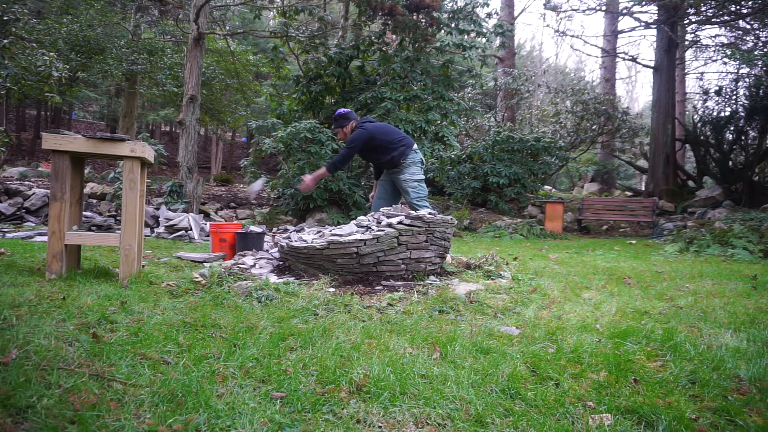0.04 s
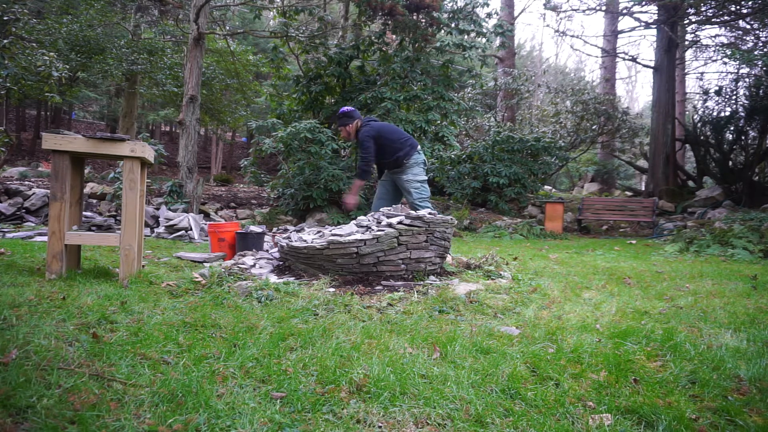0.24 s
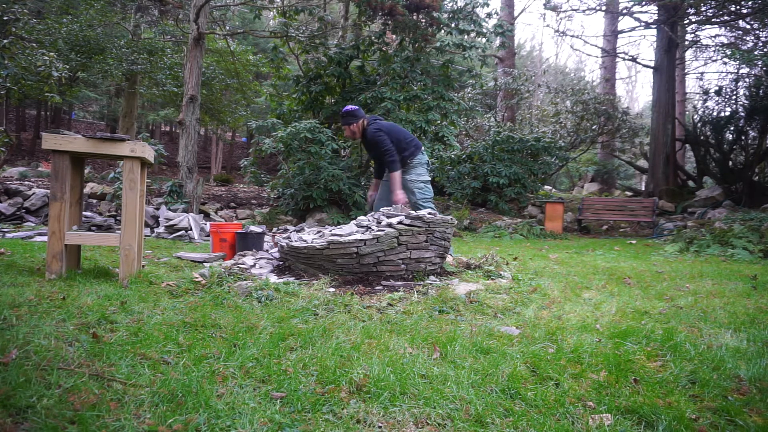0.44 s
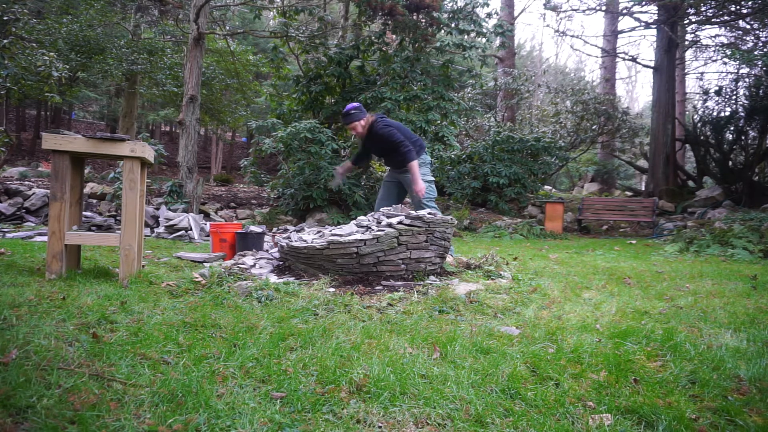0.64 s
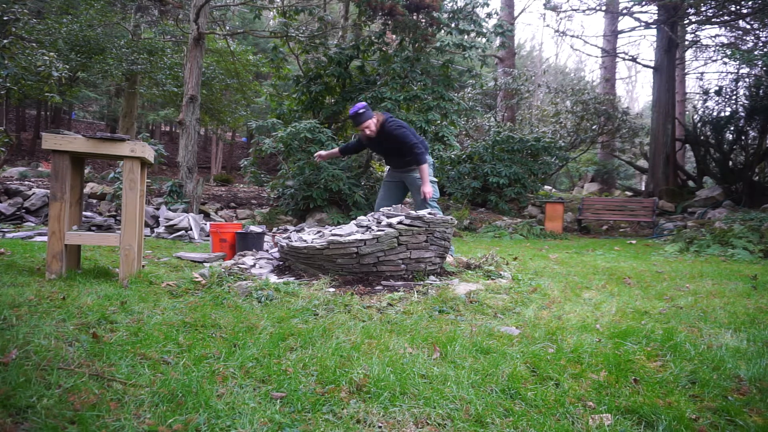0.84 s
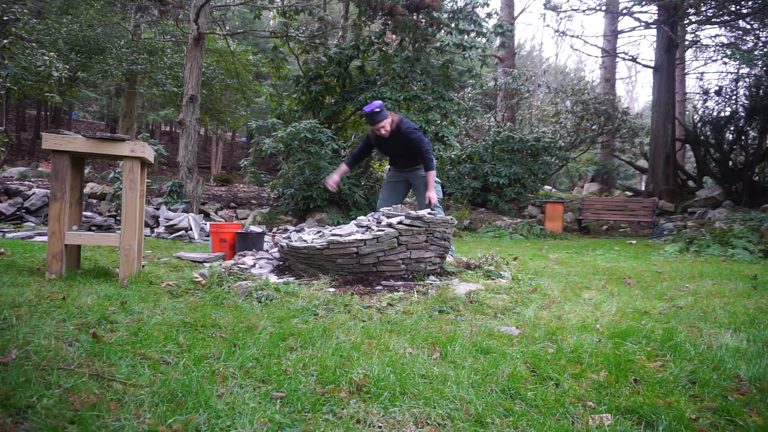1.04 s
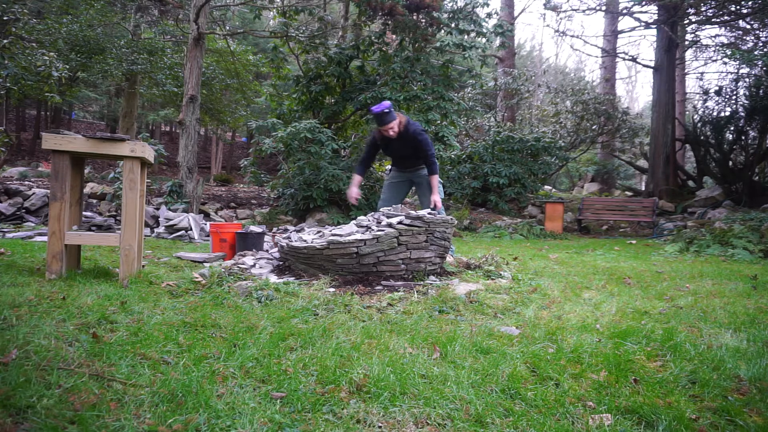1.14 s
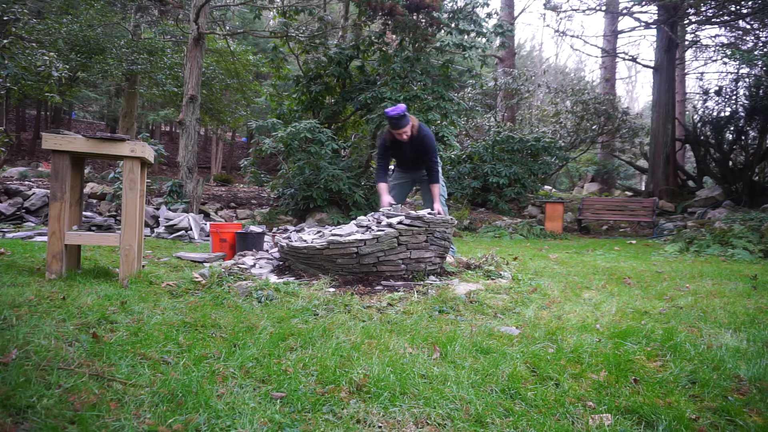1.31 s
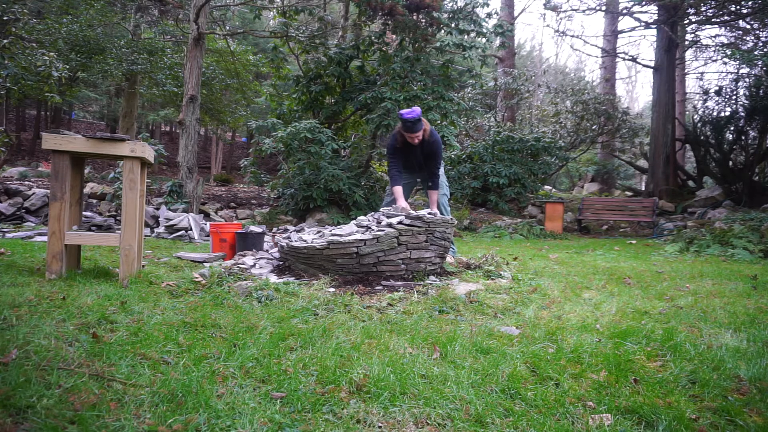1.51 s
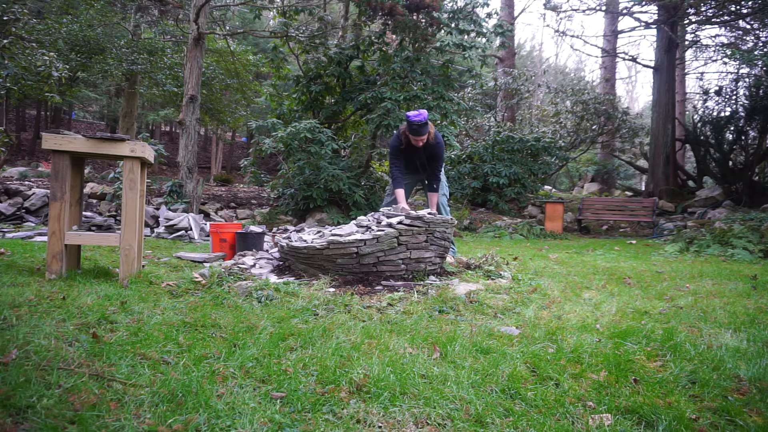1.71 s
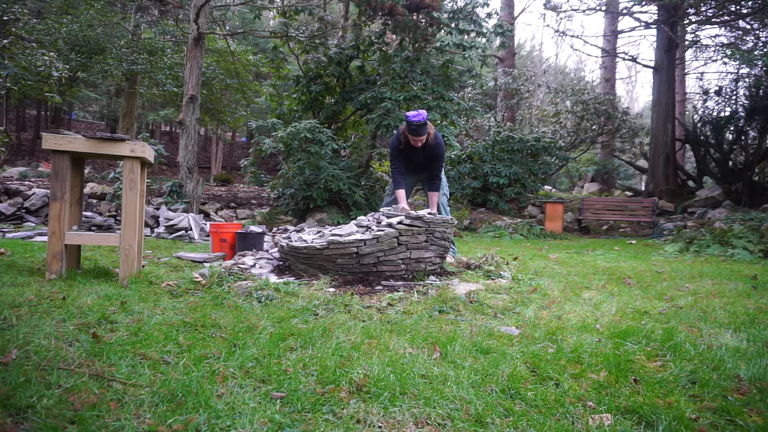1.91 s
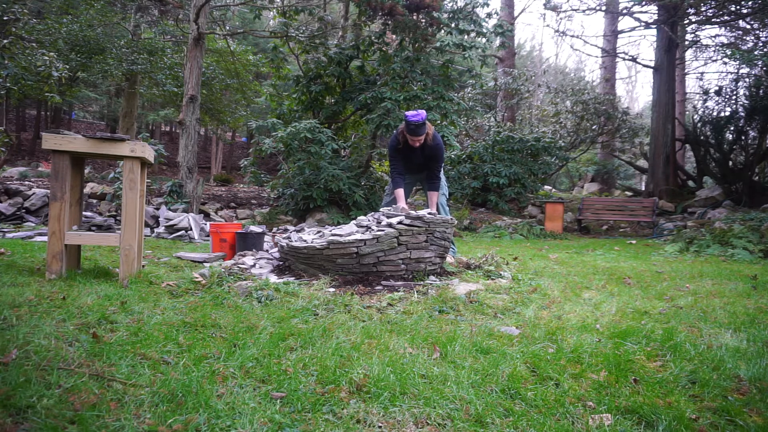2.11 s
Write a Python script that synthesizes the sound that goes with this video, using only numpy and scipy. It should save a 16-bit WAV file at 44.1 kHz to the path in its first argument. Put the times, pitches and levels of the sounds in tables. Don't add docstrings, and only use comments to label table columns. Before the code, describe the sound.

Stones clatter in a quiet wooded yard over faint distant traffic. At 0.24 s a dense burst hits a plastic bucket with hollow booms, smaller knocks settling until 0.75. After a pause, sharp stone-on-stone cracks at 1.14-1.31 tumble with sliding gravel on the left, trickling away with a light tap near 1.56. From 1.8 to 2.15 stones scrape and nudge near the middle; cloth rustles faintly.

```python
import sys
import numpy as np
from scipy import signal
from scipy.fft import rfft, irfft
from scipy.io import wavfile
from scipy.ndimage import uniform_filter1d

SR = 44100
rng = np.random.default_rng(int(sys.argv[2]) if len(sys.argv) > 2 else 0)


def invert_db(x):
    u = np.asarray(x, float) / 20
    return 10 ** u


def waveform_to_disk(signal):
    frames = np.transpose(np.atleast_2d(signal))
    scaled = np.clip(frames, -1, 1) * 32767
    samples = np.round(scaled).astype(np.int16)
    wavfile.write(sys.argv[1], SR, samples)


N = 94815

# start_s, rise_s, level_db, t60_s
SCRAPE = [
    (1.798, 0.063, -46.5, 0.93),
    (1.89, 0.029, -41, 1),
    (1.96, 0.085, -41, 0.58),
    (2.03, 0.019, -46, 0.56),
    (2.09, 0.016, -45, 0.96),
]
# freq_hz, level_db
SCRAPE_TONE = [(400, -5.5), (800, 2), (1500, -0.5), (1950, 2), (2500, -6.5), (3300, -5.5), (4100, -8.5),
               (11000, -19)]


def read(points, hz):
    f, value = np.transpose(points)
    return np.interp(np.log(hz + 1), np.log(f + 1), value)


def evened(x):
    return x / np.sqrt(np.mean(x ** 2) + 1e-20)


def add(mix, start_s, sound):
    part = mix[round(start_s * SR):][:len(sound)]
    part += sound[:len(part)]


def ring(hz, t60_s, size=1500):
    t = np.arange(size) / SR
    return invert_db(-60 * t / t60_s) * np.sin(2 * np.pi * hz * t)


def slow(size):
    return evened(uniform_filter1d(uniform_filter1d(rng.standard_normal(N), size), size))


def fuzzy(hz, width_hz):
    r = np.exp(-np.pi * width_hz / SR)
    noise = rng.standard_normal(N) + 1j * rng.standard_normal(N)
    fuzz = signal.lfilter([1], [1, -r], signal.lfilter([1], [1, -r], noise))
    phase = 2 * np.pi * np.cumsum(hz * np.ones(N)) / SR
    return evened((fuzz * np.exp(1j * phase)).real)


def hum():
    # freq_hz, level_db
    hum_tone = [(12, -59), (20, -1.5), (119, -3.5), (151, -11.5), (192, -12), (1080, -17), (2400, -31.5),
                (5000, -39.5), (10600, -40), (11500, -43), (15000, -95), (22000, -120)]
    # freq_hz, likeness
    likeness = [(60, 1.0), (220, 0.95), (840, 0.42), (3120, 0.0075), (11700, 0.035)]
    # pitch_hz, width_hz, level_db
    drones = [
        (82.8, 22, -52),
        (119.6, 8.5, -56.5),
    ]
    # time_s, pitch_hz, level_db
    engine = [(0, 299.7, -57), (.15, 330, -48), (0.902, 340, -55), (1.1, 350, -54), (1.401, 350, -52.5),
              (1.6, 280, -47.5), (1.75, 300, -46.5), (1.95, 290, -49), (2.15, 285, -45.5)]
    hum_db, swell_db, engine_width_hz = -45, -0.5, 106

    frames, hz = N // 256 + 5, np.fft.rfftfreq(1024, 1 / SR)
    a, b, c, d, patches = rng.standard_normal((frames, 513, 5)).T
    patches = evened(uniform_filter1d(uniform_filter1d(patches, 10, 0), 12, 1))
    same = np.clip(read(likeness, hz), -1, 1)[:, None]
    left = a + 1j * b
    right = same * left + np.sqrt(1 - same ** 2) * (c + 1j * d)
    z = np.array([left, right]) * invert_db(read(hum_tone, hz)[:, None] + 2.0 * patches)
    out = invert_db(hum_db) * evened(signal.istft(z, nperseg=1024, noverlap=768)[1][:, :N])
    for pitch_hz, width_hz, db in drones:
        out += invert_db(db + swell_db * slow(size=4000)) * fuzzy(pitch_hz, width_hz)
    time_s, pitch_hz, db = np.transpose(engine)
    t = np.arange(N) / SR
    return out + invert_db(np.interp(t, time_s, db)) * fuzzy(np.interp(t, time_s, pitch_hz), engine_width_hz)


def grit(flurries, tone):
    grains_per_s, grain_spread_db, grain_t60_s, kinds = 12000, 2.5, 0.0071, 24
    t = np.arange(N) / SR
    power = np.zeros(N)
    for start_s, rise_s, db, t60_s in flurries:
        decay_s = np.maximum(t - start_s - rise_s, 0)
        power += np.clip((t - start_s) / rise_s, 0, 1) ** 2 * invert_db(2 * db - 120 * decay_s / t60_s)
    level = np.sqrt(power)
    size = invert_db(grain_spread_db * np.minimum(rng.exponential(1, N), 5))
    size = size * (rng.random(N) < grains_per_s / SR)
    kind, x = rng.integers(0, kinds, N), np.zeros(N)
    for k, hz in enumerate(np.geomspace(500, 11000, kinds)):
        grain = ring(hz, grain_t60_s * (2000 / hz) ** .5, size=800)
        x += signal.oaconvolve(size * (kind == k), grain)[:N]
    z = rfft(x)
    z = z / np.sqrt(uniform_filter1d(abs(z) ** 2, 400) + 1e-9)
    z = z * invert_db(read(tone, np.fft.rfftfreq(N, 1 / SR)))
    return evened(irfft(z, N)) * level, size * level / np.sqrt(np.mean(size ** 2))


def spread(flurries, tone):
    near, shakes = grit(flurries, tone)
    return np.array([near, grit(flurries, tone)[0]]), shakes


def clack(db, hz, upper_hz, tick_db, t60_s, rise_s, upper=0.7):
    overtone_db, thud_db, tick_t60_s = -18, -14, 0.014
    t = np.arange(1500) / SR
    body = ring(hz, t60_s) - upper * ring(upper_hz, t60_s)
    body += invert_db(overtone_db) * ring(hz * 2.9, t60_s * .5)
    body += invert_db(thud_db) * ring(800, 0.0079)
    tick = signal.lfilter([1, -.6], [1], rng.standard_normal(1500)) * invert_db(tick_db - 60 * t / tick_t60_s)
    return invert_db(db) * (body * (1 - np.exp(-t / rise_s)) * 1.67 + tick)


def strike(mix, hits, t60_s=0.012, rise_s=0.00052):
    for start_s, *row in hits:
        add(mix, start_s, clack(*row, t60_s, rise_s))


def bucket():
    # start_s, clack_db, pitch_hz, low_boom_db, high_boom_db
    drops = [(0.2363, -8.5, 2080, -12, -12), (0.246, -12, 2300, -15, -13.5), (.253, -6, 2880, -7.5, -16.5),
             (.2585, -6.5, 1706, -17, -15.5), (0.272, -6, 2640, -28, -12.5),
             (0.3034, -7.5, 1970, -29, -8.5), (.349, -15, 1970, -17.5, -19), (.372, -9, 1526, -14, -26),
             (0.453, -18, 2230, -46, -44), (0.493, -12, 1690, -24, -28), (0.512, -17, 2090, -29, -44),
             (0.5802, -11, 1640, -36, -22.5), (0.578, -15.5, 4670, -38, -35), (.592, -20, 1950, -10.5, -31),
             (0.638, -17.5, 1550, -29, -30), (0.6737, -21.5, 1600, -33, -25.5), (.712, -47, 1500, -38, -52),
             (.742, -45, 1500, -40, -31)]
    # start_s, rise_s, level_db, t60_s
    churning = [
        (.237, 0.0037, -25, 0.87),
        (.285, 0.02, -42, 1),
        (.41, 0.11, -35, 0.38),
        (.453, 0.0021, -27, 0.13),
        (.475, 0.019, -30.5, 0.23),
        (.545, 0.0071, -34.5, 0.029),
        (.578, 0.001, -32, 0.25),
        (.63, 0.0049, -41.5, 0.24),
    ]
    # freq_hz, level_db
    churn_tone = [(590, 0), (1000, -1.5), (2960, -4.5), (4980, -15), (8220, -16), (11000, -22),
                  (14300, -64), (22000, -120)]
    # pitch_hz, level_db, t60_s
    modes = [(138, -12.5, 0.094), (219, -6, 0.18), (250, -6, 0.052), (300, -10, 0.087), (392, -3, 0.058),
             (469, -4, 0.15), (533, -13.5, 0.07), (566, -34, 0.028), (734.5, -10.5, 0.16), (929, -11, 0.12),
             (1140, -19, 0.076)]
    main_modes = (1, 5)
    split_hz, bass_cut_hz = 345, 120
    boom_db, mode_spread_db, wobble = -5.5, 4.5, .02
    churn_boom_db, churn_high_db = -20.5, -17
    low_damping_per_s, high_damping_per_s = 1.2, 7
    clack_t60_s, clack_rise_s, upper, wall_tick_db = .014, 0.0012, 0.26, -6

    out, shakes = spread(churning, churn_tone)
    walls, mix = np.zeros(N), rng.standard_normal((len(drops), len(modes)))
    for k, (hz, db, t60_s) in enumerate(modes):
        low, loose = hz < split_hz, k not in main_modes
        blows = shakes * rng.choice([-1., 1.], N) * invert_db(db + churn_boom_db + churn_high_db * (not low))
        walls += signal.oaconvolve(blows, ring(hz, t60_s / 2, size=9000))[:N]
        damping = low_damping_per_s if low else high_damping_per_s
        sign = (-1) ** k if low or hz > 2 * split_hz else 1
        for row, (start_s, _, _, low_db, high_db) in zip(mix, drops):
            damped_s = t60_s / (1 + damping * (start_s - drops[0][0]))
            level_db = db + (low_db if low else high_db) + boom_db + mode_spread_db * row[k] * loose
            bent_hz = hz * (1 + wobble * row[k - 1] * loose)
            add(walls, start_s, sign * invert_db(level_db) * ring(bent_hz, damped_s, size=9000))
    bass_cut = signal.butter(2, bass_cut_hz, "high", fs=SR, output="sos")
    out[0] += signal.sosfilt(bass_cut, uniform_filter1d(walls, size=15))
    for start_s, db, hz, _, high_db in drops:
        tick_db = high_db - db + wall_tick_db
        add(out[0], start_s, clack(db - 8, hz, hz * 1.2, tick_db, clack_t60_s, clack_rise_s, upper))
    return out


def booms():
    # start_s, level_db, pitch_hz, t60_s, free_s
    swings = [(.237, -16, 492, .12, 0.016), (0.2563, -16.5, 210, 0.22, 0.038),
              (.262, -18.5, 484, 0.22, 0.036), (.3042, -10.5, 474, 0.2, 0.022),
              (.352, -18, 470, 0.18, .022), (.356, -24, 221.6, 0.37, 0.063), (.385, -24, 216, 0.42, 0.094),
              (.492, -31.5, 550, 0.14, 0.036), (.506, -23, 233.4, .3, 0.035), (.548, -32, 250, .2, 0.022),
              (0.5798, -19.5, 490, .12, 0.021), (.591, -19, 222, 0.24, 0.032),
              (.6742, -21.5, 476, 0.053, 0.0054), (0.707, -34.5, 206, .2, .025)]
    rise_s, smother_t60_s = 0.0018, .04
    out, t = np.zeros(N), np.arange(9000) / SR
    for start_s, db, hz, t60_s, free_s in swings:
        level = invert_db(db - 60 * np.maximum(t - free_s, 0) / smother_t60_s)
        add(out, start_s, level * ring(hz, t60_s, size=9000) * (1 - np.exp(-t / rise_s)))
    return out


def pebbles():
    # start_s, clack_db, pitch_hz, upper_hz, tick_db
    clicks = [(0.247, -28, 8300, 3100, -8), (0.2884, -29, 2400, 3360, -15), (0.309, -22, 2650, 1920, -20),
              (.325, -32, 2900, 1620, -18), (0.4816, -26, 1660, 1020, -4), (.5466, -30, 1860, 2600, -6),
              (0.5793, -27.5, 3170, 2270, -3), (.596, -37, 1980, 2900, -13), (.622, -35, 2350, 970, -17),
              (0.742, -44, 2500, 3500, -19)]
    out = np.zeros(N)
    strike(out, clicks)
    return out


def jacket():
    # start_s, length_s, level_db, centre_hz
    rustles = [
        (0.614, 0.1, -45, 8650),
        (1.45, 0.033, -54.5, 7200),
        (1.56, 0.13, -53.5, 8700),
        (1.665, 0.16, -53, 8140),
        (1.918, 0.025, -69, 6900),
        (2.091, 0.098, -49, 7550),
    ]
    out = np.zeros((2, N))
    for start_s, length_s, db, hz in rustles:
        u = np.linspace(0, 1, round(length_s * SR))
        band = signal.butter(1, [hz * .7, min(hz * 1.42, 15000)], "bandpass", fs=SR)
        for side in out:
            cloth = evened(signal.lfilter(*band, rng.standard_normal(len(u))))
            add(side, start_s, invert_db(db) * np.sin(np.pi * u ** 0.28) * cloth)
    return out


def heap():
    # start_s, clack_db, pitch_hz, upper_hz, tick_db
    clacks = [
        (1.1442, -17, 1450, 2090, -19),
        (1.159, -19, 1390, 2480, -25),
        (1.186, -24, 2080, 2820, -9),
        (1.244, -19.5, 1890, 1650, -31),
        (1.2475, -20.5, 2080, 2320, -15),
        (1.311, -29.5, 3360, 4220, -22),
        (1.556, -29.5, 1620, 2600, -16),
        (1.662, -39, 1500, 1990, -9),
    ]
    # start_s, rise_s, level_db, t60_s
    slide = [
        (1.144, 0.0093, -33.5, 0.46),
        (1.165, 0.013, -32, 0.43),
        (1.225, 0.015, -32.5, 0.51),
        (1.297, 0.01, -35, 0.2),
        (1.36, 0.035, -48, 1.17),
        (1.55, 0.018, -56.5, 2.9),
    ]
    # freq_hz, level_db
    slide_tone = [(400, -50), (800, -18), (1250, -12.5), (1800, -3.5), (2200, -4.5), (2900, -9),
                  (3700, -10.5), (11000, -32.5)]
    out = spread(slide, slide_tone)[0]
    strike(out[0], clacks)
    return out


def rolls():
    # start_s, rise_s, level_db, t60_s, pitch_hz
    rolling = [
        (1.148, 0.0032, -27.5, 0.11, 1900),
        (1.168, 0.012, -32.5, 0.22, 2510),
        (1.222, 0.019, -32.5, 0.24, 2050),
        (1.255, 0.011, -39, 0.18, 1740),
        (1.303, 0.011, -40, 0.22, 3300),
        (1.31, 0.0092, -40.5, 0.31, 2050),
    ]
    knock_t60_s, knocks_per_s = .012, 830
    out, t = np.zeros(N), np.arange(9000) / SR
    for start_s, rise_s, db, t60_s, hz in rolling:
        knocks = rng.standard_normal(9000) * (rng.random(9000) < knocks_per_s / SR)
        chatter = evened(signal.oaconvolve(knocks, ring(hz, knock_t60_s))[:9000])
        level = np.clip(t / rise_s, 0, 1) * invert_db(db - 60 * np.maximum(t - rise_s, 0) / t60_s)
        add(out, start_s, chatter * level)
    return out


def cracks():
    # start_s, clack_db, pitch_hz, upper_hz, tick_db
    hard_hits = [
        (1.1553, -11, 1840, 2780, -24),
        (1.2178, -9.5, 1800, 2350, -17),
        (1.2776, -22.5, 1580, 2180, -24),
        (1.2848, -17.5, 1750, 3300, -19),
    ]
    rise_s, snap_db, snap_hz, snap_t60_s = 0.00044, 2, 3300, 0.0014
    out = np.zeros(N)
    strike(out, hard_hits, t60_s=0.0067, rise_s=rise_s)
    for start_s, db, *_ in hard_hits:
        add(out, start_s + rise_s, invert_db(db + snap_db) * ring(snap_hz, snap_t60_s))
    return out


def hands():
    # start_s, clack_db, pitch_hz, upper_hz, tick_db
    nudges = [(1.9165, -31.5, 2450, 1500, -27), (1.978, -34, 1500, 2530, -16),
              (2.046, -25, 2570, 1610, -38), (2.074, -31, 1580, 2300, -9), (2.1025, -32.5, 3010, 1920, -14),
              (2.107, -32.5, 2000, 1500, -20), (1.8951, -37, 2390, 1360, -22),
              (1.928, -46, 5230, 1500, -12), (2.016, -31, 2500, 1500, -20), (2.124, -40, 5900, 1430, -4)]
    out = spread(SCRAPE, SCRAPE_TONE)[0]
    strike(out[0], nudges)
    return out


def slab():
    # pitch_hz, level_db, t60_s
    slab_modes = [(1500, -1.5, 0.029), (2500, -2, 0.025), (4180, -9, 0.018), (4920, -12, 0.021)]
    slab_db, slip_spread_db = -2.5, 4.7
    slips = grit(SCRAPE, SCRAPE_TONE)[1] * rng.choice([-1., 1.], N) * invert_db(slip_spread_db * slow(size=150))
    body = sum(invert_db(db) * ring(hz, t60_s, size=2500) for hz, db, t60_s in slab_modes)
    return invert_db(slab_db) * signal.oaconvolve(slips, body / np.linalg.norm(body))[:N]


def place(x, lead_s, low_db, high_db):
    scatter, turn_limit_rad = 0.7, 2.47
    hz = np.fft.rfftfreq(N, 1 / SR)
    treble = np.minimum(hz / 8000, 1)
    turn = turn_limit_rad * np.tanh(2 * np.pi * hz * lead_s / turn_limit_rad)
    side = invert_db((low_db + (high_db - low_db) * treble ** 0.52) / 2) * np.exp(.5j * turn)
    apart = np.clip(scatter * treble ** 0.27, 0, 1)
    direct = rfft(x[0]) * np.array([side, 1 / side])
    scattered = rfft(x[1]) * apart * np.array([side, -1 / side])
    return irfft(direct + scattered, N)


def yard(x):
    # freq_hz, t60_s
    echo_t60 = [(150, 0.56), (500, 0.37), (2000, 0.6), (5000, 0.39), (10000, 0.72)]
    ports_hz, spacing = 1500, 20
    taps = np.zeros((2, SR // 2))
    slots = np.arange(100, SR // 2 - spacing, spacing)
    at = slots + rng.integers(0, spacing, (2, len(slots)))
    np.put_along_axis(taps, at, rng.choice([-1., 1.], at.shape), 1)
    hz, t, z = signal.stft(taps, SR, nperseg=256)
    same = (1 / (1 + (hz / ports_hz) ** 2))[:, None]
    z = np.array([z[0], same * z[0] + np.sqrt(1 - same ** 2) * z[1]])
    tail = signal.istft(z * invert_db(-60 * t / read(echo_t60, hz)[:, None]), SR, nperseg=256)[1]
    return signal.fftconvolve(x[None], tail / np.linalg.norm(tail[0]), axes=1)[:, :N]


def scene():
    # left_lead_s, left_right_low_db, left_right_8khz_db
    left_side = (.00006, 0.12, 5.4)
    right_side = (-0.000013, -.2, -1.8)
    yard_db = -7.5
    left = bucket() + heap()
    left[0] += booms() + pebbles() + rolls() + cracks()
    right = hands() * invert_db(-2.0)
    right[0] += slab() * invert_db(-4.5)
    direct = place(left, *left_side) + place(right, *right_side)
    return direct + invert_db(yard_db) * yard(left[0] + right[0]) + jacket() + hum()


def low_pass(x):
    return signal.sosfilt(signal.butter(12, 12270, fs=SR, output="sos"), x)


def record(dry):
    edge_hz = 11150
    edge = signal.firwin(601, edge_hz, window=("kaiser", 7), fs=SR)
    return low_pass(signal.oaconvolve(dry, edge[None], "same"))


dry = scene()
out = record(dry)
waveform_to_disk(out)
```